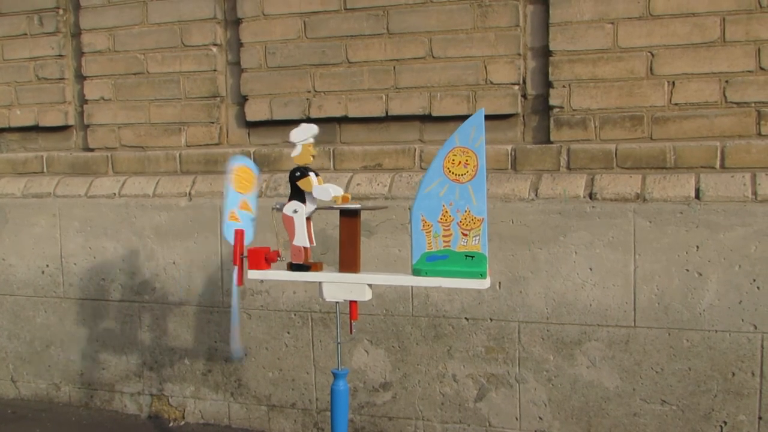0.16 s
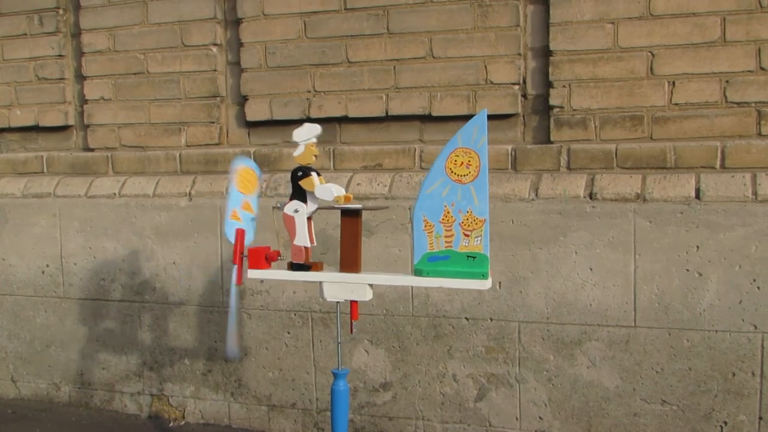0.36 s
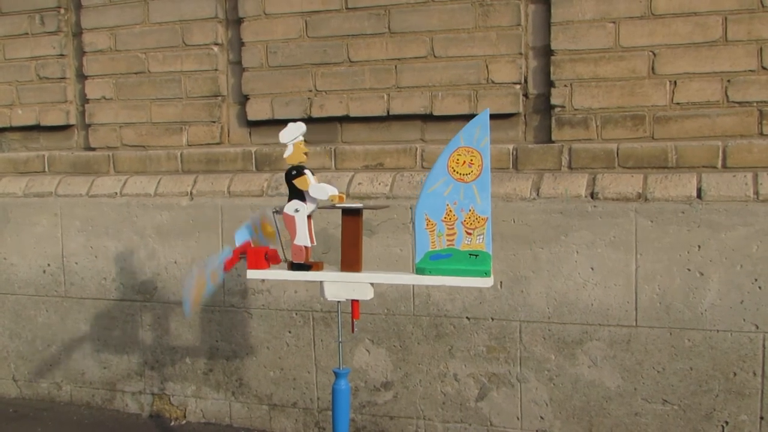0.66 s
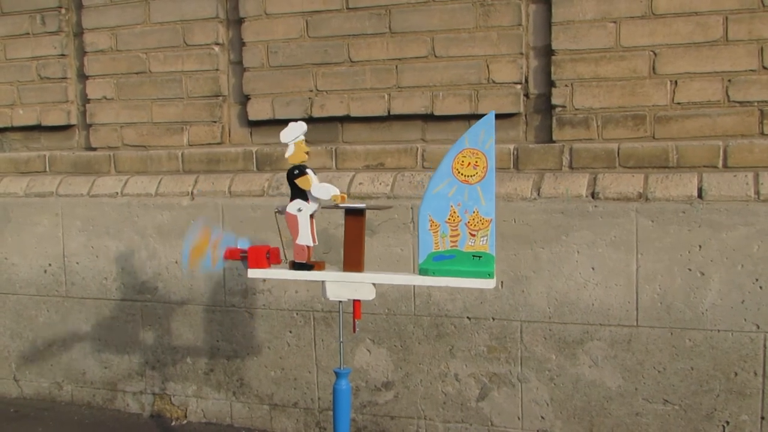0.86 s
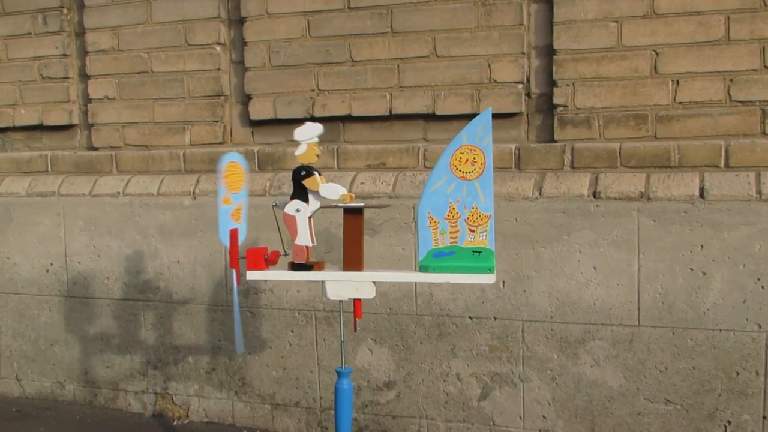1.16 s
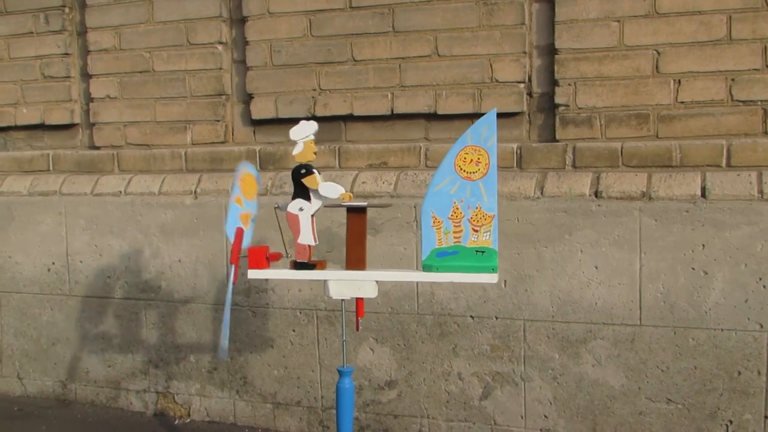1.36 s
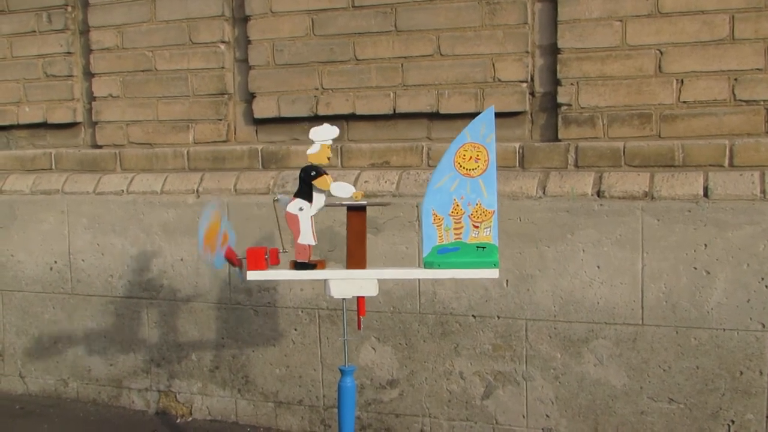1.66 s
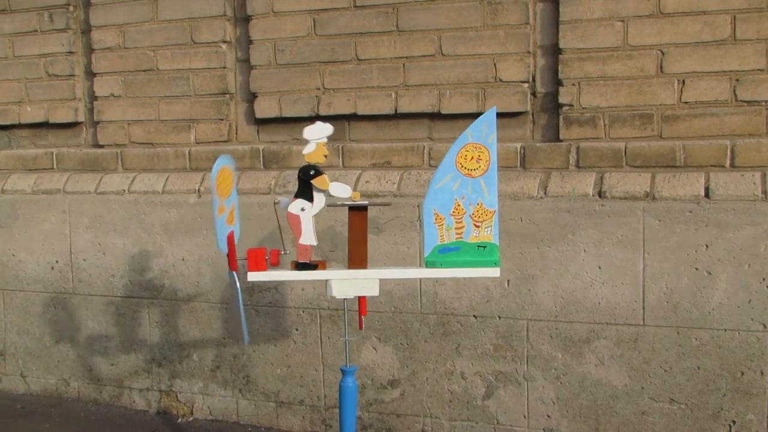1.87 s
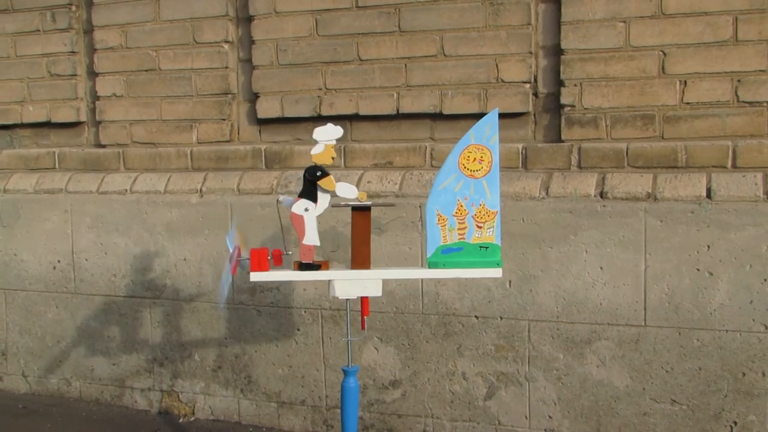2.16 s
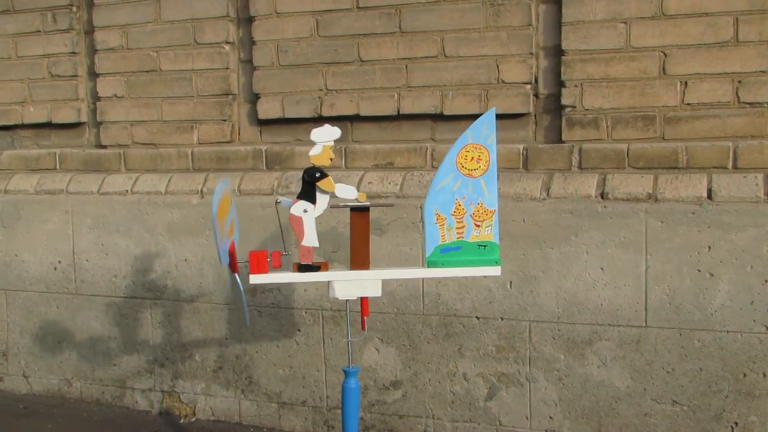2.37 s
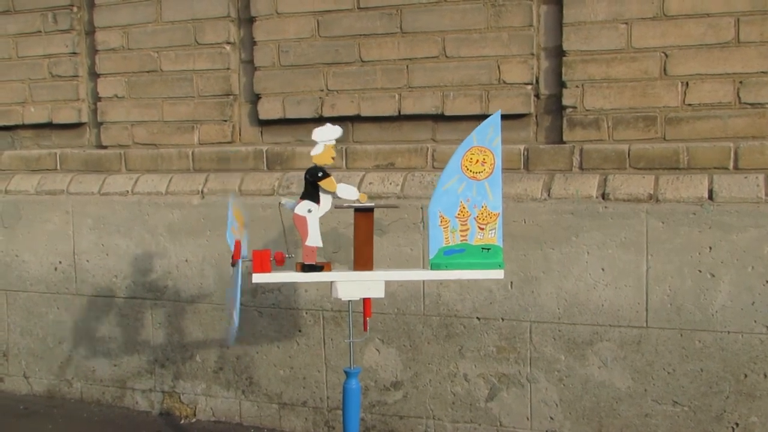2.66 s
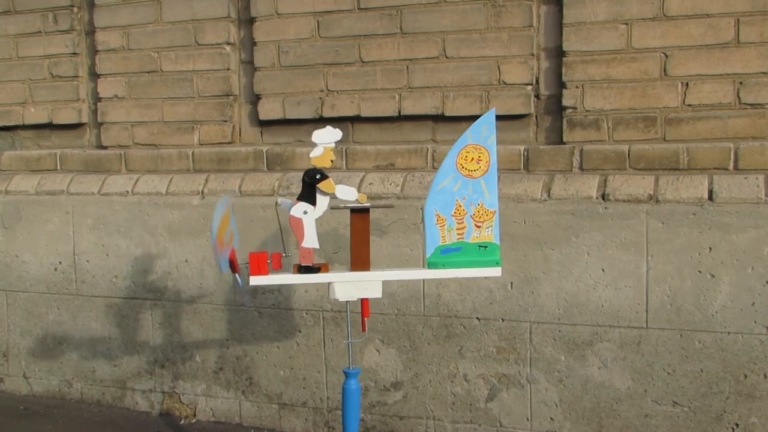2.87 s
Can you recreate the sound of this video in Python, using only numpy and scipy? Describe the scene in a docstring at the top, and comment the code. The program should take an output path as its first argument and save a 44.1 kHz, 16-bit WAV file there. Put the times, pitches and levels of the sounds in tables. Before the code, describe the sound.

Wind rumbles and thumps on the microphone over a spinning wooden whirligig's faint, dry clacks.

```python
"""Outdoors by a brick wall, a wooden whirligig spins in gusty wind, about four turns a second.
Its crank throws a little figure up and down with light, dry clacks; the loose linkage rattles,
the wire rod scrapes and now and then the dry axle chirps. Eddies rumble and slap against the
two microphone ports, far louder than the toy. Under it all lies a faint, wide hush."""
import sys
import numpy as np
from scipy import signal
from scipy.fft import rfft, irfft
from scipy.io import wavfile
from scipy.ndimage import uniform_filter1d, map_coordinates

SR = 44100
rng = np.random.default_rng(int(sys.argv[2]) if len(sys.argv) > 2 else 0)


def log_audio(samples):
    """Write samples as a 16-bit WAV file to the path given in sys.argv[1]."""
    # one column per channel
    frames = np.atleast_2d(samples).T
    # limit to full scale, then quantise
    limited = np.clip(frames, -1, 1)
    pcm = np.round(limited * 32767).astype(np.int16)
    wavfile.write(sys.argv[1], SR, pcm)


N = 133623

# tone of the outdoor bed: (frequency [Hz], relative spectral density [dB])
HUSH_SPECTRUM = [(100, 3.5), (600, 5), (1500, 8), (2300, -0.5), (3300, -3.5), (4500, -11.5), (7000, -15),
                 (11000, -20.5), (14000, -27)]
# the hush sinking and rising, lifting as the crank rubs near 2 s: (time [s], relative level [dB])
HUSH_SWELL = [(0, -53.5), (.45, -54), (.8, -57), (1.3, -57), (1.85, -59.5), (1.93, -56), (2.05, -57.5),
              (2.15, -57.5), (2.7, -56.5), (3.03, -55)]
# gusts at the microphone: (time [s], wind speed [relative to NOMINAL_SPEED], relative level [dB])
GUST_CURVE = [(0, 510.3, -14), (.045, 359.3, -17), (.08, 414.6, -19), (.18, 436.5, -14.5),
              (.281, 374.4, -14), (.621, 329.4, -16.5), (.742, 156.6, -19.5), (.782, 191.6, -11.5),
              (.807, 158.9, -26.5), (.895, 183.7, -13.5), (.921, 279.6, -10.5), (.952, 193, -16.5),
              (.99, 173.8, -16), (1.022, 320.9, -10), (1.075, 320.9, -12.5), (1.148, 300.2, -17),
              (1.235, 236.8, -17), (1.272, 199.7, -15.5), (1.30, 269.1, -14.5), (1.42, 217.4, -15.5),
              (1.468, 316.6, -19.5), (1.584, 175.1, -16.5), (1.699, 173.1, -24.5), (1.734, 169.8, -13),
              (1.819, 150.2, -19.5), (1.85, 230.7, -16.5), (1.924, 186.8, -13), (1.979, 274.4, -14),
              (2.025, 163.7, -13.5), (2.095, 200.2, -13.5), (2.115, 313.8, -11), (2.19, 200.3, -15),
              (2.235, 154.8, -19), (2.491, 300, -14.5), (2.601, 264.4, -14), (2.656, 164.6, -16.5),
              (2.78, 172.2, -21), (2.82, 261.3, -9.5), (2.87, 290.6, -15), (3.027, 272.7, -14)]
# single hard eddies: (time [s], peak at the port [dB], pitch [Hz], port [-1 left, 1 right])
EDDY_SLAPS = [(.004, -27, 838, -1), (.008, -3, 560, -1), (.015, -23, 1380, -1), (.02, -2.5, 347, -1),
              (.051, -3.5, 138, 1), (.068, -9, 600, -1), (0.078, -11, 615, -1), (.1, -34, 923, -1),
              (0.13, -25, 674, -1), (.174, -4, 490, -1), (.181, -20, 1235, -1), (0.194, -19, 520, -1),
              (.303, -26, 560, -1), (.333, -19, 720, -1), (0.346, -3.5, 380, -1), (.42, -7, 504, -1),
              (0.448, -21, 760, -1), (.491, 2, 174, 1), (0.503, -6.5, 515.2, -1), (.527, 0.5, 121, 1),
              (.542, -21, 923, -1), (0.58, -20, 980, -1), (.776, -15, 526, -1), (0.918, -6.5, 588.2, -1),
              (.92, -9, 607, -1), (.926, -10, 546, -1), (.938, -17.5, 586, -1), (1.011, -1, 350, -1),
              (1.015, 0, 368, -1), (1.036, -2.5, 400, -1), (1.039, -20.5, 1590, -1), (1.062, -12, 420, -1),
              (1.093, -24, 923, -1), (1.108, -20, 520, -1), (1.16, -14.5, 513, -1), (1.212, -17.5, 690, -1),
              (1.244, -16, 463, -1), (1.273, -3.5, 150.2, 1), (1.288, -16.5, 838, -1),
              (1.315, -10.5, 337, -1), (1.333, -14, 580, -1), (1.355, -11, 420, -1), (1.37, -19.5, 760, -1),
              (1.436, -9, 339.3, -1), (1.447, -1, 280, -1), (1.474, -15.5, 715, -1), (1.48, -26, 690, -1),
              (1.541, -7, 260, -1), (1.579, -6, 136, -1), (1.743, -9.5, 210.2, -1), (1.849, -18.5, 399, -1),
              (1.963, -2, 190.9, -1), (1.973, -7.5, 260.4, -1), (1.983, -23, 760, 1),
              (2.031, -14, 110.1, -1), (2.08, -5, 310, -1), (2.108, -12.5, 690, -1),
              (2.115, -5.5, 380.5, -1), (2.138, -3.5, 484, 1), (2.308, -16.5, 540.6, 1),
              (2.342, -8, 249.9, -1), (2.44, -15, 499, -1), (2.512, -2, 245.2, 1), (2.538, -17, 479.7, -1),
              (2.604, -12.5, 520, -1), (2.801, -14, 450.3, -1), (2.813, -8, 514.5, 1),
              (2.818, -23.5, 1200, -1), (2.821, -4, 129.5, -1), (2.838, -11.5, 796.2, -1),
              (2.846, 1.5, 272, 1), (2.853, -3, 150, 1), (2.883, -15, 756, -1), (2.904, -3, 390, -1),
              (2.95, -29, 480, -1), (2.955, 0, 340, -1), (3.018, -23, 1015, -1)]
# the dry axle rubbing: (time [s], level [dB], half length [s])
AXLE_CHIRPS = [(0.198, -61.5, 0.023), (0.4, -55, 0.0088)]
# ring of the axle: (frequency [Hz], bandwidth [Hz], relative gain [dB])
AXLE_MODES = [(3270, 270, 12), (5260, 500, -24)]
# ring of the wooden toy: (frequency [Hz], bandwidth [Hz], relative gain [dB])
BODY_MODES = [(1472.5, 640, 5), (2620, 490, 10), (3030, 860, 3.5), (4270, 580, 6), (6400, 2100, -3),
              (7650, 350, 4.5), (8780, 330, 3), (9800, 920, 1), (11100, 1900, 1.5), (12270, 970, 3),
              (13700, 820, -3)]
# the crank's stroke and return in turn: (time [s], relative level [dB], contact length [s])
CRANK_CLACKS = [(0.099, -56, 0.005), (.182, -61.5, 0.0092), (0.308, -56.5, 0.0049), (0.402, -63, .003),
                (0.524, -56.5, 0.0038), (0.625, -70, 0.0062), (0.742, -57, 0.0061), (0.848, -60, 0.018),
                (0.97, -56, 0.0092), (1.068, -65, 0.015), (1.193, -56, 0.01), (1.311, -59.5, 0.013),
                (1.427, -54, 0.0053), (1.52, -67, 0.022), (1.651, -56, 0.0094), (1.763, -67.5, 0.018),
                (1.893, -57, 0.0045), (2.005, -57.5, 0.007), (2.127, -57.5, 0.0092), (2.25, -63, 0.015),
                (2.38, -57.5, 0.0072), (2.497, -59, 0.015), (2.616, -54, 0.0085), (2.729, -61, 0.011),
                (2.874, -62.5, 0.0054), (2.995, -59, 0.0032)]
# the loose linkage bouncing back: (time [s], relative level [dB], contact length [s])
LINKAGE_REBOUNDS = [(0.338, -64, .003), (0.558, -61, 0.0032), (0.775, -68, .003), (1.007, -66, 0.0024),
                    (1.227, -62, 0.0031), (1.334, -65, 0.0033), (1.686, -66, .004), (1.719, -63.5, 0.005),
                    (1.791, -61, 0.0027), (2.027, -59, 0.0035), (2.167, -67, .003), (2.197, -66.5, .003),
                    (2.491, -63, 0.003), (2.753, -70, 0.0036), (2.979, -59, 0.0066)]
# the wire rod dragging in its guide: (time [s], relative level [dB], contact length [s])
ROD_SCRAPES = [(1.26, -68, .008), (1.413, -72, 0.0076), (1.925, -71, 0.02), (1.956, -67, .022),
               (2.364, -69, 0.0077), (2.43, -73, 0.019), (2.518, -68, 0.0094), (2.649, -72, .008)]
# narrow gaps in the microphone's response: (frequency [Hz], bandwidth [Hz])
MIC_NOTCHES = [(3930, 310), (7900, 340)]

NOMINAL_SPEED, RIGHT_PORT_SPEED_RATIO = 280, .82
EDDY_ROLLOFF_HZ, EDDY_STEEPNESS, EDDY_RISE = 298, 1.209, .33   # rumble's tone at nominal speed
SWIRL_DEPTH, SWIRL_PER_S, BUFFET_DB, BUFFET_PER_S = .16, 130, 3, 51   # swing of log speed and of level
CROSSFEED_GAIN, CROSSFEED_HZ = .71, 1433
WIND_TRIM_DB, TOY_TRIM_DB, TOY_SIDE_DB = -2.5, -1.5, -8
CONTACT_ATTACK_S, CONTACT_T60_S, GRIT_DB = .00072, .056, 2.5
CONTACT_DETUNE, CONTACT_COLOUR_DB = .025, 2   # hit-to-hit spread of each mode's log pitch and gain
RATTLES_PER_S, RATTLE_DB, RATTLE_SPREAD_DB, RATTLE_LENGTH_S = 12, -79.5, 2.5, .0027


def from_db(db):
    """Decibels to gain."""
    return 10 ** (np.asarray(db) / 20)


def unit_rms(x):
    """Scale to an rms of one."""
    return x / np.sqrt(np.mean(x ** 2) + 1e-20)


def automation(rows):
    """Straight ramps between timed breakpoints; one curve per value column."""
    times, *columns = np.transpose(rows)
    return [np.interp(np.arange(N) / SR, times, column) for column in columns]


def drift(rate):
    """Smooth random modulation with a spread of one."""
    hop, run_in = 40, 2000
    pole = np.exp(-2 * np.pi * rate * hop / SR)
    noise = rng.standard_normal(N // hop + run_in + 2)
    wander = signal.lfilter([1], [1, -2 * pole, pole ** 2], noise)[run_in:]
    return np.interp(np.arange(N) / hop, np.arange(len(wander)), unit_rms(wander))


def butter(x, hz, kind, order):
    """Butterworth low- or high-pass."""
    return signal.sosfilt(signal.butter(order, hz, kind, fs=SR, output="sos"), x)


def resonate(x, modes):
    """Parallel resonators of alternating polarity; white noise keeps about its level."""
    out, power = 0, 0
    for k, (hz, width, db) in enumerate(modes):
        radius = np.exp(-np.pi * width / SR)
        feed = (1 - radius ** 2) / 2
        poles = [1, -2 * radius * np.cos(2 * np.pi * hz / SR), radius ** 2]
        ring = signal.lfilter([feed, 0, -feed], poles, x + 1e-18)
        out = out + (-1) ** k * from_db(db) * ring
        power += feed * from_db(db) ** 2
    return out / np.sqrt(power)


def stereo(mid, side, side_db, pan_db=0):
    """Mid and side to left and right; positive pan leans right."""
    sign = np.array([[-1], [1]])
    return (mid + sign * from_db(side_db) * side) * from_db(sign * pan_db)


def outdoor_hush():
    """A faint, wide hush slowly sinks and rises, with a brief lift as the crank rubs near two seconds."""
    hz, db = np.transpose(HUSH_SPECTRUM)
    bin_hz = np.arange(N + 1) * SR / (2 * N)
    colour = from_db(np.interp(np.log(bin_hz + 1), np.log(hz), db))
    noise = rng.standard_normal((2, 2 * N))
    mid, side = unit_rms(irfft(rfft(noise) * colour)[:, :N])
    swell = from_db(automation(HUSH_SWELL)[0] - 5.5)
    return swell * stereo(mid, side, side_db=-4, pan_db=-1.6)


def port_rumble(wind_speed, level_db):
    """A frozen pattern of eddies blows past one port: the faster it passes, the brighter the rumble."""
    size = 2 ** 18
    hz = np.arange(size // 2 + 1) * SR / size
    colour = (hz + 1) ** EDDY_RISE * np.exp(-(hz / EDDY_ROLLOFF_HZ) ** EDDY_STEEPNESS)
    eddies = unit_rms(irfft(rfft(rng.standard_normal(size)) * colour))
    speed = wind_speed / NOMINAL_SPEED * np.exp(SWIRL_DEPTH * drift(SWIRL_PER_S))
    pressure = map_coordinates(eddies, [np.cumsum(speed)], order=3, mode="wrap")
    return pressure * from_db(WIND_TRIM_DB + level_db + BUFFET_DB * drift(BUFFET_PER_S))


def eddy_slaps():
    """A hard eddy is one sharp pressure spike at one port; the smaller it is, the higher its pitch."""
    size, steepness = 2 ** 12, 1.75
    out = np.zeros((2, N))
    bin_hz = np.arange(size // 2 + 1) * SR / size
    polarities = rng.choice([-1, 1], len(EDDY_SLAPS))
    for (time, db, hz, port), polarity in zip(EDDY_SLAPS, polarities):
        slope = (bin_hz / hz) ** steepness
        spike = np.roll(irfft(slope * np.exp(-slope)), size // 2)   # spectrum peaks at hz
        at = int(time * SR) - size // 2 + np.arange(size)
        inside = (at >= 0) & (at < N)
        out[int(port > 0), at[inside]] += polarity * from_db(db) * spike[inside] / spike.max()
    return out


def wind_on_microphone():
    """Both ports ride the same gusts, but each catches its own eddies."""
    speed, level_db = automation(GUST_CURVE)
    left = port_rumble(speed, level_db)
    right = port_rumble(speed * RIGHT_PORT_SPEED_RATIO, level_db)
    ports = butter(np.array([left, right]) + eddy_slaps(), hz=56, kind="high", order=2)
    # the microphone subtracts each port's lows from the other, so the rumble sits out of phase
    opposite_lows = butter(ports[::-1], CROSSFEED_HZ, "low", order=1)
    return (ports - CROSSFEED_GAIN * opposite_lows) / np.sqrt(1 + CROSSFEED_GAIN ** 2)


def axle_chirps():
    """Brief swells of friction noise ring the dry axle."""
    t = np.arange(N) / SR
    rub = sum(from_db(db) * np.exp(-((t - time) / half) ** 2) for time, db, half in AXLE_CHIRPS)
    mid, side = resonate(rub * rng.standard_normal((2, N)), AXLE_MODES)
    return stereo(mid, side, TOY_SIDE_DB)


def wood_contact(db, length):
    """One gritty touch, as mid and side; each lands on a new spot and rings the toy in a new colour."""
    age = np.arange(SR // 10) / SR
    attack = np.clip(age / CONTACT_ATTACK_S, 0, 1)
    force = attack * from_db(db - 60 * np.maximum(age - length, 0) / CONTACT_T60_S)
    roughness = unit_rms(uniform_filter1d(rng.standard_normal(len(age)), size=48))
    grit = unit_rms(from_db(GRIT_DB * roughness))
    scatter = rng.standard_normal((len(BODY_MODES), 2))
    modes = [(hz * np.exp(CONTACT_DETUNE * shift), width, gain_db + CONTACT_COLOUR_DB * weight)
             for (hz, width, gain_db), (shift, weight) in zip(BODY_MODES, scatter)]
    return resonate(force * grit * rng.standard_normal((2, len(age))), modes)


def whirligig():
    """Crank clacks, rebounds and rod scrapes, with a faint random rattle from play in the linkage."""
    gap_draws, level_draws = rng.random((100, 2)).T
    rattle_times = np.cumsum(-np.log(1 - gap_draws) / RATTLES_PER_S)
    rattle_levels = RATTLE_DB + RATTLE_SPREAD_DB * (2 * level_draws - 1)
    rattles = [(time, db, RATTLE_LENGTH_S) for time, db in zip(rattle_times, rattle_levels)]
    out = np.zeros((2, N + SR))
    for time, db, length in CRANK_CLACKS + LINKAGE_REBOUNDS + ROD_SCRAPES + rattles:
        hit = wood_contact(db, length)
        start = min(int(time * SR), N)
        out[:, start:start + hit.shape[1]] += hit
    mid, side = out[:, :N]
    return from_db(TOY_TRIM_DB) * stereo(mid, side, TOY_SIDE_DB)


def scene():
    """The mix: wind right on the microphone, the small toy behind it, the hush underneath."""
    return wind_on_microphone() + whirligig() + axle_chirps() + outdoor_hush()


def record(dry):
    """The microphone chain rounds the hottest peaks, notches two narrow bands and cuts the top."""
    ceiling, cutoff_hz = 1.1, 15200
    rounded = ceiling * np.tanh(dry / ceiling)
    for hz, width in MIC_NOTCHES:
        rounded = signal.lfilter(*signal.iirnotch(hz, hz / width, fs=SR), rounded)
    return signal.sosfilt(signal.cheby2(12, 50, cutoff_hz, fs=SR, output="sos"), rounded)


dry = scene()
out = record(dry)
log_audio(out)
```